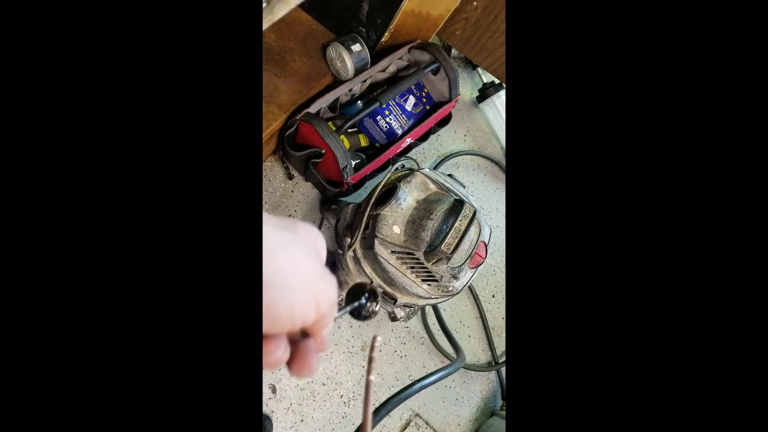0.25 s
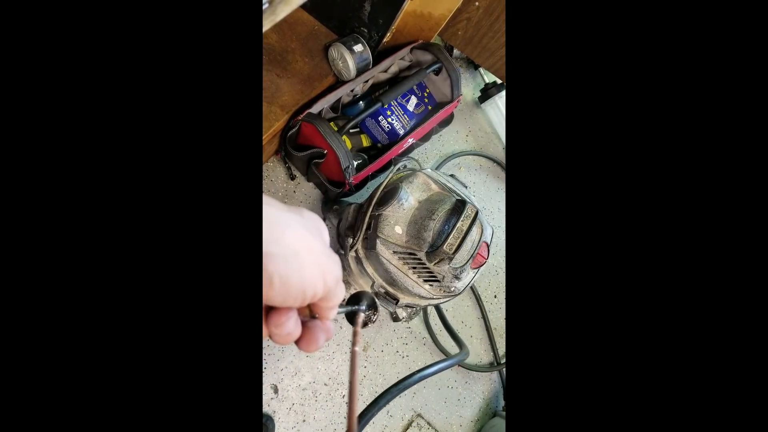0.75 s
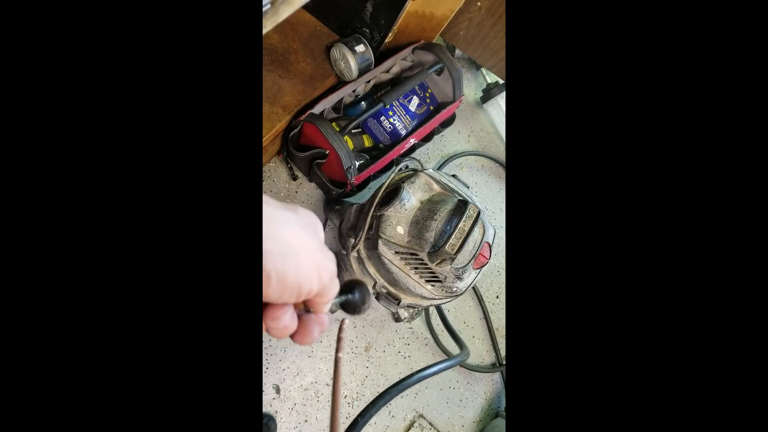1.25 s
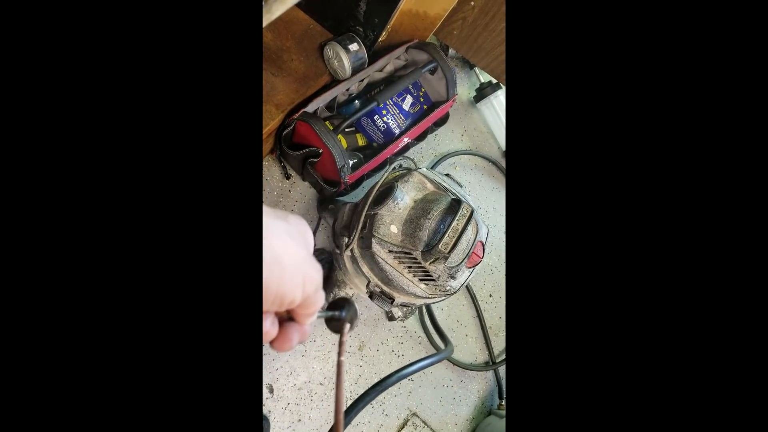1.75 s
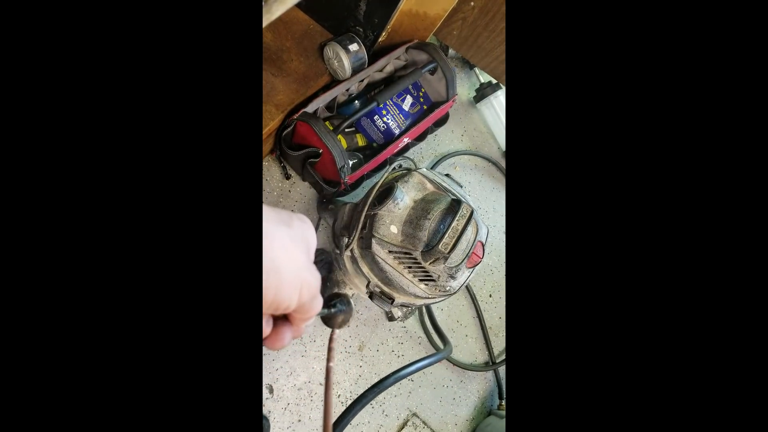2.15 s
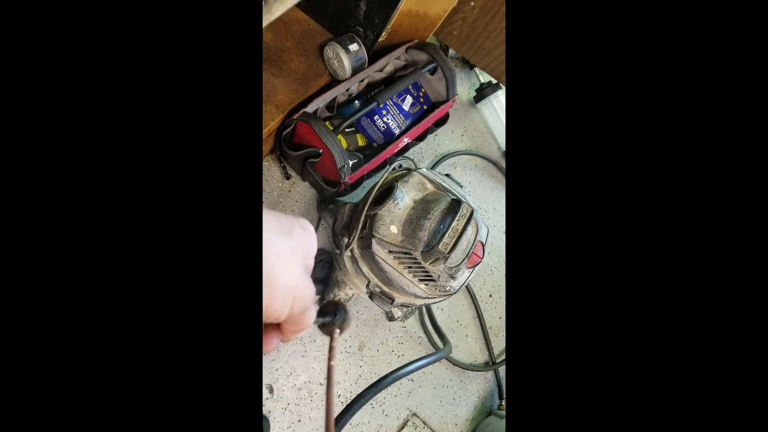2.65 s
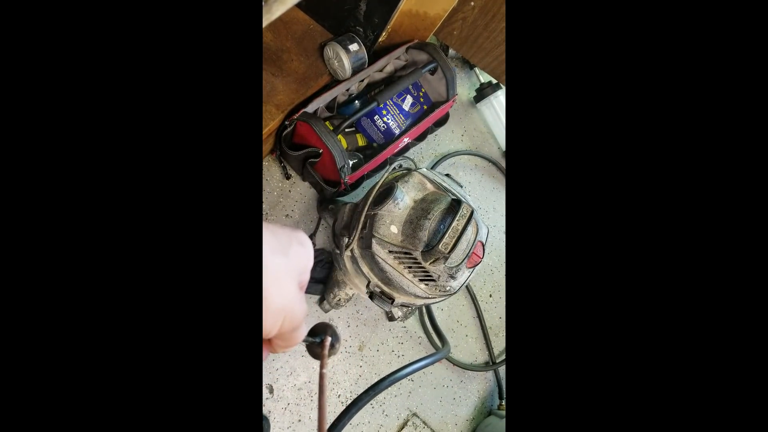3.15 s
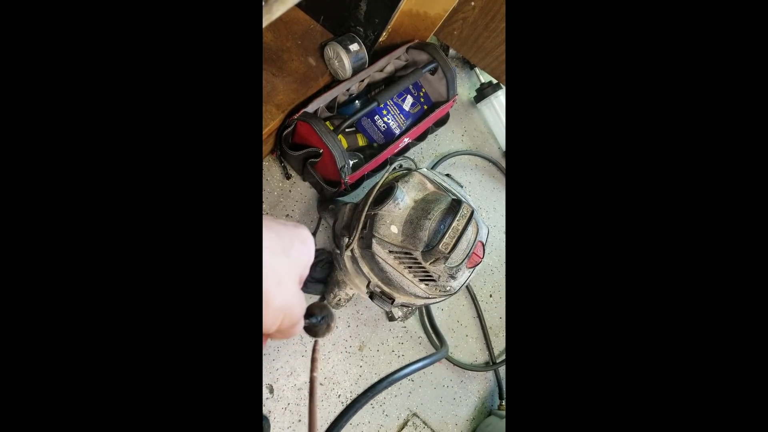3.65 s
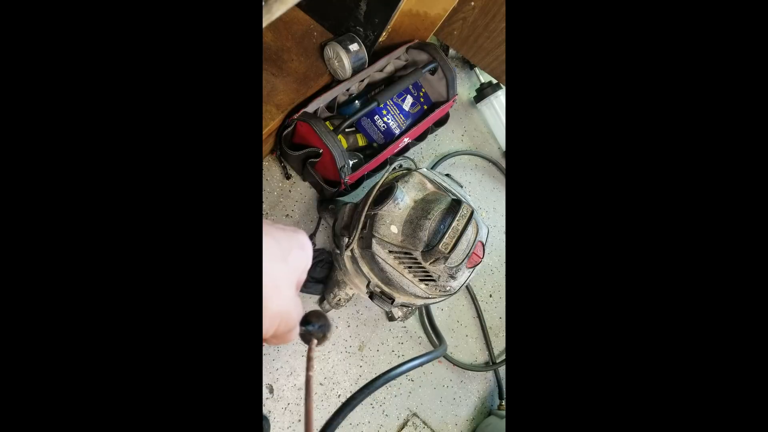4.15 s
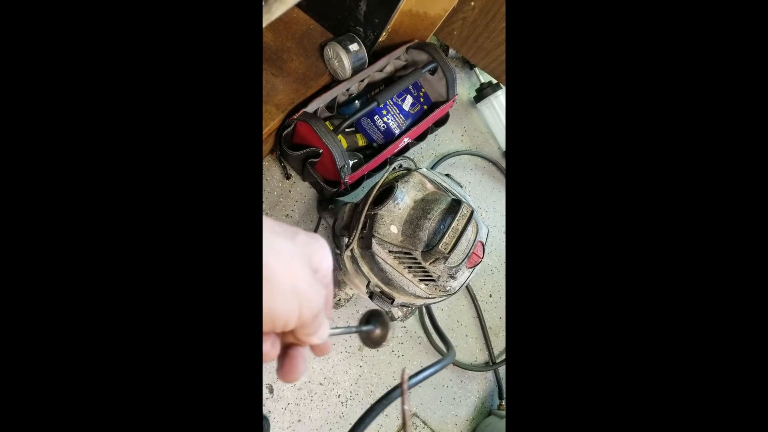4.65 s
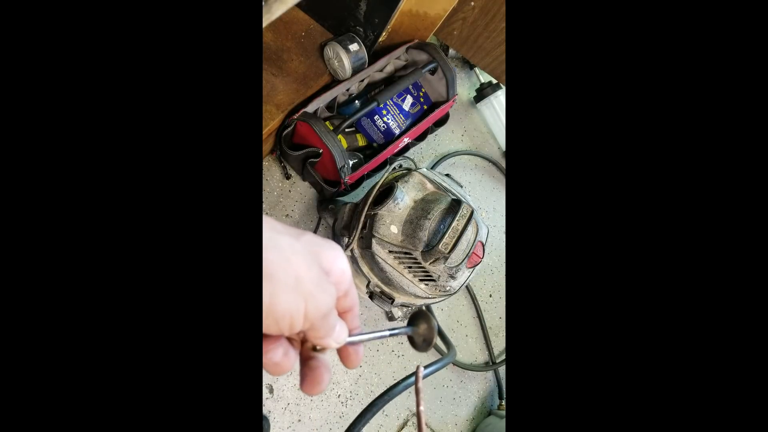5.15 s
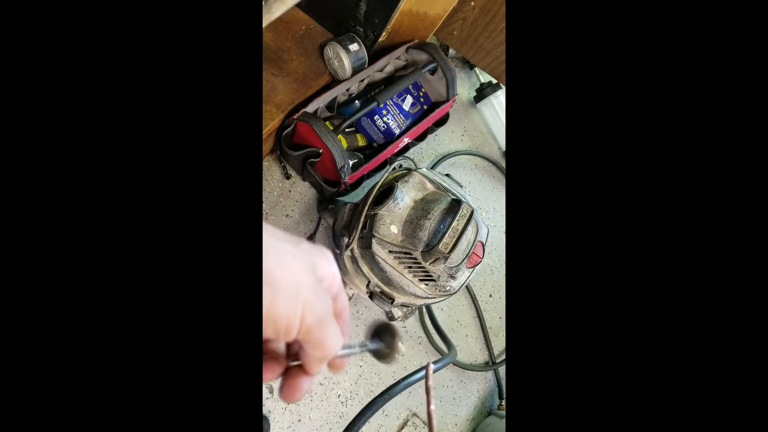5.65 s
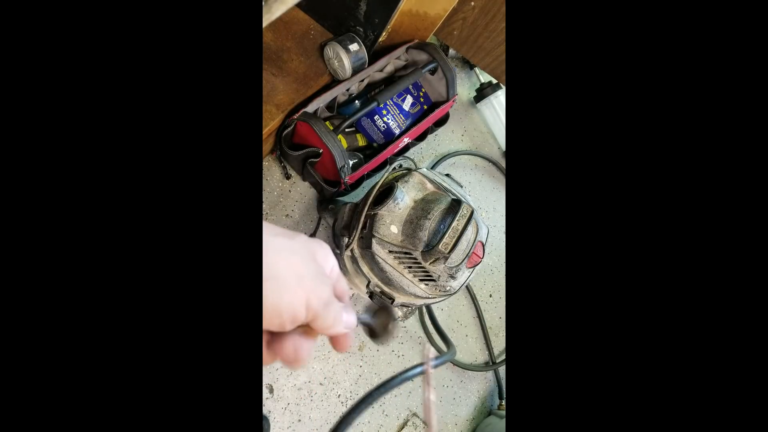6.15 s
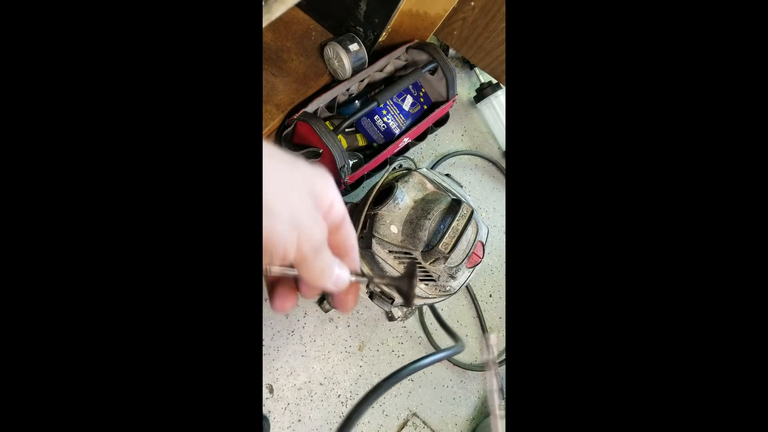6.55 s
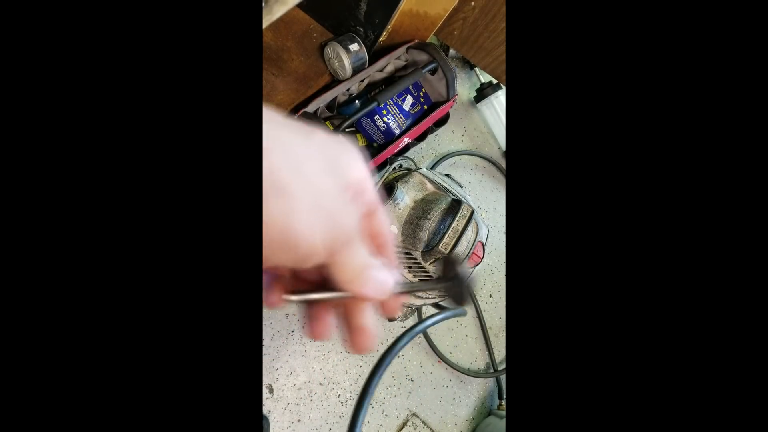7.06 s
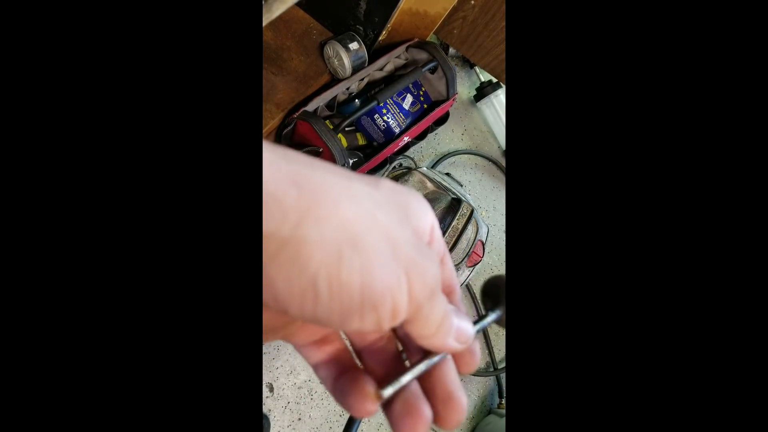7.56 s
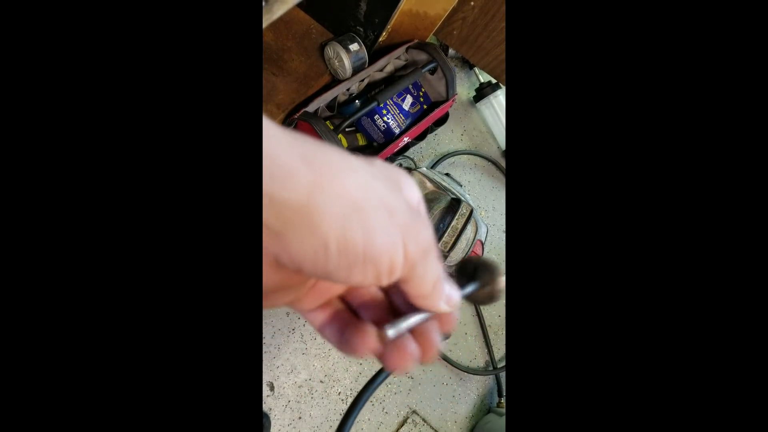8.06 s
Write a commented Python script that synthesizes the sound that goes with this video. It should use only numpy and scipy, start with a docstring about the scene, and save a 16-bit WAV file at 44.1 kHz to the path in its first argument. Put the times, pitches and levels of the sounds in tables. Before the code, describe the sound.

Close to a hand-held microphone in a small garage, a sleeve brushes and a grip rumbles softly. A quick puff of compressed air is followed by a long, loud, bright hiss against a metal engine valve, its tone shifting slightly with the angle. It cuts off suddenly with a short room tail, leaving near quiet, faint crackles, soft rubbing and a few small metal ticks.

```python
"""A sleeve brushes and a grip rumbles, then one short and one long blast of a blow gun hiss and roar.
The gun cleans an engine valve held close to a hand-held camera in a small garage: turbulent noise,
coloured by resonances and echoes, roars when the jet strikes the valve head squarely, then leaks faintly.
Then the valve is turned over in the hand: carbon crackles, fingers wipe, a sleeve rustles, and the
grip rubs the camera's shell, all as shaped noise; metal ticks are bursts of slips ringing decaying modes."""
import sys
import numpy as np
from scipy import signal
from scipy.fft import rfft, irfft
from scipy.io import wavfile
from scipy.ndimage import uniform_filter1d

SR = 44100
rng = np.random.default_rng(int(sys.argv[2]) if len(sys.argv) > 2 else 0)


def to_wav(sig):
    """Store sig (one row per channel, or 1-D mono) as 16-bit WAV at the path in sys.argv[1].

    Samples outside -1..1 are clipped; the rate is SR.
    """
    pcm = np.clip(np.atleast_2d(sig), -1, 1) * 32767
    pcm = np.round(pcm).astype(np.int16)
    wavfile.write(sys.argv[1], SR, pcm.T)  # frames by channels


N = 365994
SIZE = 1024  # samples in a noise frame; frames step by a quarter of it
HZ = np.fft.rfftfreq(SIZE, 1 / SR)
FRAME_S = np.arange(N // (SIZE // 4) + 5) * (SIZE // 4) / SR
TIME = np.arange(N) / SR


def amp(db):
    """Level law: decibels to amplitude gain."""
    return 10 ** (np.asarray(db) / 20)


def unit(x):
    """Power normalisation: scales to rms 1."""
    return x / np.sqrt(np.mean(x ** 2) + 1e-20)


def read(points, hz):
    """Spectral interpolation: reads a curve on a log-frequency axis."""
    f, value = np.transpose(points)
    return np.interp(np.log(hz + 1), np.log(f + 1), value)


def follow(rows, t):
    """Linear interpolation in time: reads each column of a table at the times t."""
    s, *columns = np.transpose(rows)
    return [np.interp(t, s, column) for column in columns]


def add(mix, s, sound):
    """Superposition: mixes a sound in at time s."""
    part = mix[..., max(round(s * SR), 0):][..., :sound.shape[-1]]
    part += sound[..., :part.shape[-1]]


def drift(t, top_hz):
    """Slow random modulation of rms 1: sines of random phase at rates up to top_hz."""
    knots = np.linspace(t[0], t[-1], min(len(t), 12000))
    wander = np.zeros(len(knots))
    for f in top_hz * np.geomspace(1 / 20, 1, 20):
        wander += np.sin(2 * np.pi * (f * knots + rng.random())) / np.sqrt(f)
    return unit(np.interp(t, knots, wander))


def noise(db, likeness, paths=1):
    """Partly coherent two-port noise of rms 1: db shapes its spectrum, paths is each port's complex gain."""
    a, b, c, d = rng.standard_normal((4, len(FRAME_S), len(HZ)))
    same = np.clip(likeness, 0, 1)
    left = a + 1j * b
    right = same * left + np.sqrt(1 - same ** 2) * (c + 1j * d)
    frames = np.array([left, right]) * amp(db) * paths
    ports = signal.istft(frames.swapaxes(1, 2), nperseg=SIZE, noverlap=SIZE - SIZE // 4)[1]
    return unit(ports[:, :N])


def pan(db):
    """Interaural level difference: gains of the two ports for a left-right difference in dB."""
    return amp(np.array([np.atleast_1d(db), -np.atleast_1d(db)]) / 2)


def bump(centre_hz, width_hz):
    """Resonance curve of Lorentzian shape, 1 at its top."""
    return 1 / (1 + (2 * (HZ - centre_hz) / width_hz) ** 2)


# Colour of the quiet air. Each row: frequency in Hz, relative spectral level in dB.
FLOOR_COLOUR = [(15, -30.5), (25, 3.5), (122, -0.5), (246, -23), (359, -7), (598, -23.5), (762, -21.5),
                (2060, -22.5), (2700, -19), (6550, -15), (8810, -27.5), (12500, -19.5), (15500, -25)]


def quiet_air(level_db=-68.5):
    """Diffuse-field coherence: background noise is alike at both ports only in the bass."""
    return amp(level_db) * noise(read(FLOOR_COLOUR, HZ), read([(100, 0.99), (1000, 0.19)], HZ))


# The hand brings the valve under the nozzle.
# One row: relative levels in dB of grip rubbing, cloth brushing, sleeve swish.
REACH = (-52.5, -50.5, -61.5)
# Loudness of the rubbing while the valve is turned over and looked at.
# Each row: time in seconds, relative levels in dB of grip rubbing, cloth brushing, sleeve swish.
TURNING = [(4.5, -84, -88, -68.5), (4.8, -76, -77.5, -66.5), (5.17, -77, -82, -72.5),
           (5.4, -63, -73.5, -63), (5.65, -65.5, -67, -62), (6.05, -69, -74, -62),
           (6.38, -67.5, -65, -61.5), (6.58, -56, -67, -62.5), (6.8, -59, -66, -57.5),
           (6.92, -55, -66, -63.5), (7.25, -57.5, -72.5, -65), (7.5, -66.5, -75, -70),
           (7.92, -66.5, -72.5, -72), (8.18, -59.5, -71.5, -69.5)]


def movement(jerk_db=4, jerk_s=0.06, rest_s=0.7, settle_db_per_s=31.5):
    """Friction grows with motion: gains of grip, cloth and sleeve in the reach and the later turning."""
    # the reach starts with a jerk, moves steadily, then comes to rest
    jerk = jerk_db * np.exp(-TIME / jerk_s)
    settling = settle_db_per_s * np.maximum(TIME - rest_s, 0)
    reach = amp(np.array(REACH)[:, None] + jerk - settling)
    air_is_off = TIME > PULLS[-1][1]
    return reach + amp(follow(TURNING, TIME)) * air_is_off


# Colours of grip, cloth and sleeve swish. Each row: frequency in Hz, relative spectral level in dB.
GRIP_COLOUR = [(25, 0.5), (60, -3), (130, 2.5), (250, -7.5), (400, -9), (700, -31), (2000, -57.5)]
CLOTH_COLOUR = [(150, -26.5), (400, -1.5), (750, 4), (1200, -1), (2000, -11), (4000, -44.5)]
SWISH_COLOUR = [(600, -17.5), (2000, -2.5), (3900, 2), (5200, -1.5), (7600, -1.5), (8600, -19),
                (10000, -18.5), (12500, -15.5), (15700, -14)]
# The grip slips and the camera's shell drones.
# Each row: start in seconds, end in seconds, mean pitch in Hz, relative level in dB.
SLIPS = [(0.08, 0.755, 201.8, -52.5), (0.94, 1.063, 205, -63), (6.48, 6.788, 203, -62.5),
         (6.76, 7.426, 202, -59.5)]


def handling(grip_db=1.5, cloth_db=-2.0, swish_db=-0.5, grain_db=1.0, drone_db=0.0, jitter=0.037, shake_db=3.0):
    """Friction noise and stick-slip: the grip rumbles through the camera's body, the sleeve brushes."""
    grip, cloth, swish = movement()
    rumble = grip * amp(grip_db) * noise(read(GRIP_COLOUR, HZ), 0.82)
    brush = cloth * amp(cloth_db) * noise(read(CLOTH_COLOUR, HZ), 0.19)
    grain = amp(swish_db + grain_db * drift(TIME, 200))
    fibres = swish * grain * noise(read(SWISH_COLOUR, HZ), 0.099)
    drone, slipping = np.zeros(N), np.zeros(N)
    for start, end, hz, db in SLIPS:
        # skin sticks and slips at the shell's resonance, unevenly
        t = np.arange(start, end, 1 / SR)
        turns = np.cumsum(hz * (1 + jitter * drift(t, 120))) / SR
        window = signal.windows.tukey(len(t), .3)
        level = amp(db + drone_db + shake_db * drift(t, 50))
        add(drone, start, window * level * unit(np.sin(2 * np.pi * turns)))
        add(slipping, start, window)
    # while it slips, part of the rubbing goes into the drone
    return rumble * amp(-3 * slipping) + drone + brush + fibres


# Soft pushes on the microphone, from the grip shifting and from spilled air.
# Each row: start in seconds, peak level in dB before panning.
GUSTS = [(0.05, -36), (0.059, -34.5), (0.696, -38), (0.823, -39), (0.868, -41), (1.076, -38.5),
         (1.261, -43.5), (1.554, -49.5), (2.584, -43), (3.35, -51)]


def gusts(push_s=0.0016, side_db=-5):
    """Pressure pulse: each puff gives the ports a soft push and a longer pull."""
    u = np.arange(SR // 10) / SR / push_s
    puff = u * (2 - u) * np.exp(-u)
    out = np.zeros(N)
    for s, db in GUSTS:
        add(out, s, amp(db) * puff / puff.max())
    return out * pan(side_db)


# Trigger pulls. Each row: time fully open in seconds, time it begins to shut in seconds.
PULLS = [(0.696, 0.856), (1.080, 4.189)]


def trigger(open_s=.0026, shut_s=.008):
    """Exponential flow transients: air swells as the seat lifts and dies as the nozzle empties."""
    flow = np.zeros(N)
    for on, off in PULLS:
        rise = np.minimum((TIME - on) / open_s, 0)
        fall = np.minimum((off - TIME) / shut_s, 0)
        flow += np.exp(rise + fall)
    return flow


SAG_S = 0.28  # time constant of the hose pressure, seconds


def surge(t):
    """Reservoir discharge: spare hose pressure, 1 as the trigger opens, sagging towards 0."""
    spare = 0
    for on, off in PULLS:
        pulled = (t > on - SAG_S / 10) * (t < off + SAG_S / 10)
        spare = spare + pulled * np.exp(-np.maximum(t - on, 0) / SAG_S)
    return spare


def delayed(ms):
    """Fourier shift theorem: complex gain of a delay in milliseconds."""
    return np.exp(-2j * np.pi * HZ * ms / 1000)


# Aim of the nozzle. Each row: time in seconds, lag of the left port in ms, factor on the gap's resonances.
BEARING = [(0.7, 0.054, 1), (1.3, 0.044, 1.01), (1.6, 0.059, 1.06), (2.6, 0.064, 1.01), (2.8, 0.085, 0.96),
           (4.2, 0.074, 1.06)]
# Near echoes off the hand, the gun and the engine.
# Each row: mean delay left in ms, mean delay right in ms, level in dB before the treble weighting.
ECHOES = [(0.62, 0.898, -17.5), (1.9, 1.6, -16), (3.1, 3.4, -13.5), (4.9, 4.6, -15)]
# Direction of the jet as the two ports hear it. Each row: frequency in Hz, left-right difference in dB.
JET_SIDE = [(100, -10.5), (400, -7.5), (1200, -1), (2800, -1.5), (4600, -1.5), (6500, 1), (7200, -4),
            (8100, -5.5), (9400, 0), (14500, -0.5), (15600, 9.5)]


def jet_paths(sway=.07):
    """Comb filtering: near echoes comb the hiss at each port, and the combs slide as the hand sways."""
    lag_ms = follow(BEARING, FRAME_S[:, None])[0]
    late = delayed(lag_ms / 2)
    paths = np.array([late, late.conj()])
    reflected = read([(700, 0.16), (2500, 1.0)], HZ)  # small surfaces throw back only short waves
    for left_ms, right_ms, db in ECHOES:
        stretch = 1 + sway * drift(FRAME_S, 2)[:, None]
        echo = np.array([delayed(left_ms * stretch), delayed(right_ms * stretch)])
        paths = paths + reflected * amp(db) * echo
    return paths * pan(read(JET_SIDE, HZ))[:, None]


# Basic colour of the jet. Each row: frequency in Hz, relative spectral level in dB.
JET_COLOUR = [(40, -45), (125, -25), (700, -22), (1300, -18.5), (2400, -12), (3500, -9), (4300, -2),
              (6500, 0), (7900, -1.5), (8700, -8.5), (9500, -10), (11800, -1.5), (14000, -4), (15700, -6.5)]
# Resonances of the gap between nozzle, valve and hand.
# Each row: frequency in Hz before the bearing's factor, width in Hz, boost in dB.
GAP = [(2400, 240, 2), (2750, 250, 3), (3060, 170, 2.5), (4400, 770, 1), (7574, 540, 3)]
# The hollow of the fingers, blown across by the deflected jet.
# Each row: time in seconds, frequency in Hz, boost in dB.
HOLLOW = [(0.7, 1985, 2), (1.1, 2200, 3.5), (1.35, 2156, 2.5), (1.6, 2400, 2.5), (3.0, 3000, -1),
          (3.68, 2950, 2), (3.85, 2350, 2.5), (4.2, 2370, 0.5)]
# How the jet meets the valve as it is turned. Each row: time in seconds, relative hiss level in dB,
# roar off the head in dB, sizzle at the rim in dB, all before surge, tremor and weighting.
AIM = [(0.755, -15, 3, -3.5), (0.8, -18, 2, 3), (0.845, -15, -3, 0), (1.1, -18.5, 1.5, 1.3),
       (1.25, -18, 1.2, 0), (1.42, -19, 2.4, -3), (2.06, -18, -0.3, -2), (2.25, -19, 0.1, 0.7),
       (2.61, -19.5, 1.5, -0.5), (2.67, -19.5, -3, -4), (2.98, -20, -3.3, 0.6), (3.29, -19.5, -4, 0.3),
       (3.42, -16, -1, 1.8), (3.62, -18, -0.5, -1.9), (3.93, -17.5, -1.5, 0.5), (4.03, -19, 1.5, -0.5),
       (4.17, -17.5, -0.1, 0.5)]


def jet(level_db=2.0, patchy_db=0.93, flutter_db=0.67, tremor_db=0.9, tremor_hz=7,
        surge_db=2.5, surge_roar_db=2.5):
    """Turbulent jet noise: hiss coloured by pressure and by how it meets the valve in an unsteady hand."""
    frame_s = FRAME_S[:, None]
    _, roar_db, sizzle_db = follow(AIM, frame_s)
    roar_db = roar_db + surge_roar_db * surge(frame_s)
    sizzle_db = sizzle_db + tremor_db * drift(FRAME_S, tremor_hz)[:, None]
    _, narrowing = follow(BEARING, frame_s)
    db = read(JET_COLOUR, HZ)
    for hz, width, gain in GAP:
        db = db + gain * bump(hz * narrowing, width)
    hollow_hz, hollow_db = follow(HOLLOW, frame_s)
    db = db + hollow_db * bump(hollow_hz, 450)
    # a square hit on the head sheds large eddies; grazing the rim sheds small ones
    db = db + roar_db * read([(300, -0.24), (900, 0.13), (1900, 0.71), (3300, 0.84), (5500, -0.17)], HZ)
    db = db + sizzle_db * read([(7500, 0.067), (11000, 1)], HZ)
    # noise smoothed over time, then over frequency, makes patches
    eddies = uniform_filter1d(rng.standard_normal(db.shape), size=24, axis=0)
    eddies = uniform_filter1d(eddies, size=8, axis=1)
    likeness = read([(200, 0.56), (1400, 0.44), (4500, 0.87), (9000, 0.49), (16000, 0.87)], HZ)
    hiss = noise(db + patchy_db * unit(eddies), likeness, jet_paths())
    hiss_db = follow(AIM, TIME)[0] + surge_db * surge(TIME)
    return hiss * trigger() * amp(level_db + hiss_db + flutter_db * drift(TIME, 60))


# What the valve and gun ring with, deepest first.
# Each row: frequency in Hz, relative level in dB, time to fall 60 dB in seconds.
METAL = [(2335, 1.5, 0.023), (3920, -0.5, 0.007), (4276, -2.5, 0.007), (7220, -0.5, 0.0056),
         (10210, -9.5, 0.0037), (13600, 4, 0.004)]
# Small metal contacts. Each row: time in seconds, peak level in dB before reflections and panning,
# scrape length in seconds, brightness in dB per octave, share of the deep clink from 0 to 1.
TICKS = [(0.9832, -22.5, 0.0025, 4.5, 0), (5.308, -46.5, 0.0036, 0, 0.3), (6.015, -45, 0.002, -2, 0.1),
         (6.2667, -48, 0.0019, -3, 0.07), (6.313, -37, 0.0024, 0, 0.2), (6.4888, -33.5, 0.0034, 3, 0.5),
         (6.9713, -39, 0.0029, 1, 0), (7.0637, -34.5, 0.0022, 8, 0), (7.094, -40, 0.0015, -1, 0),
         (7.1106, -27, 0.003, 2, 0.2), (7.113, -27, 0.0054, 6, 0.1), (7.1275, -45, 0.003, -6, 0.2),
         (7.159, -36, 0.005, 0, 0.5), (7.1647, -32, 0.0067, 1.5, 1), (7.8337, -48, 0.0046, -4, 0),
         (7.877, -42, 0.0049, 3, 0.3), (7.883, -31.5, 0.0015, 2, 0), (7.889, -38, 0.0014, -0.5, 0),
         (8.0917, -39, 0.0033, -1.5, 0)]


def ticks(level_db=0.0, ring=0.17, lag_s=0.00048, scatter=0.33):
    """Modal excitation: a quick run of tiny slips rings the metal briefly, nearer the right port."""
    t = np.arange(SR // 10) / SR
    modes = np.array([amp(db - 60 * t / t60) * np.cos(2 * np.pi * hz * t) for hz, db, t60 in METAL])
    hz = np.fft.rfftfreq(len(t), 1 / SR)
    base_db = read([(500, -17.5), (2000, -5.0), (4000, -1), (15000, 0), (17000, -14.5)], hz)
    lead = SR // 500  # samples of room before the contact
    out = np.zeros((2, N))
    for s, db, length, bright_db, clink in TICKS:
        body = (t == 0) + ring * (clink * modes[0] + modes[1:].sum(0))
        # slips common to both ports plus each port's own
        slips = rng.standard_normal(len(t)) + scatter * rng.standard_normal((2, len(t)))
        slips = np.roll(slips * np.exp(-(t / length) ** 4), lead, axis=1)
        colour = amp(bright_db * np.log2((hz + 500) / 7000) + base_db)
        tick = irfft(rfft(slips) * rfft(body) * colour, len(t))
        left, right = amp(db + level_db) * tick / abs(tick).max()
        add(out[0], s - lead / SR + lag_s / 2, left)
        add(out[1], s - lead / SR - lag_s / 2, right)
    return out


# When loose carbon crackles. One row: start in seconds, end in seconds.
CRUMBLING = (4.36, 4.8)


def crumbs(per_s=50, db=-65, grain_s=0.0023):
    """Random impulse process: loosened carbon crackles between the fingers once the air has stopped."""
    loose = (TIME > CRUMBLING[0]) * (TIME < CRUMBLING[1])
    hit = (rng.random(N) < per_s / SR) * loose
    decay = np.exp(-TIME[:SR // 20] / grain_s)
    grains = signal.oaconvolve(hit * rng.uniform(0.33, 1, N), decay)[:N]
    colour = read([(1500, -25), (4000, -8), (7500, -4), (9200, -8), (12000, 7), (15500, -11)], HZ)
    return amp(db) * grains * noise(colour, 0.33)


# Soft swells of noise: the first two rows leak from the nozzle, the later ones are finger wipes.
# Each row: time of the crest in seconds, time from crest to e^-2 of its amplitude in seconds,
# relative level in dB, centre frequency in Hz.
SWELLS = [(4.452, 0.17, -65, 13100), (4.718, 0.1, -68, 13180), (6.025, 0.051, -67, 13100),
          (6.127, 0.079, -66, 13200), (6.637, 0.027, -56, 766), (6.73, 0.041, -58.5, 13000),
          (6.80, 0.06, -62, 840), (6.828, 0.067, -64, 12000)]
LEAKS, WIPES = SWELLS[:2], SWELLS[2:]


def swells(rows):
    """Band-limited noise: each row swells and fades under a Gaussian envelope."""
    t = np.arange(-SR // 4, SR // 4) / SR
    hz = np.fft.rfftfreq(len(t), 1 / SR)
    out = np.zeros((2, N))
    for s, length, db, centre_hz in rows:
        band = np.interp(hz, HZ, bump(centre_hz, 0.64 * centre_hz))
        grain = irfft(rfft(rng.standard_normal((2, len(t)))) * band, len(t))
        both = unit(grain + 0.16 * grain[::-1])  # each port hears a little of the other
        add(out, s + t[0], amp(db) * np.exp(-2 * (t / length) ** 2) * both)
    return out


def nozzle_leak():
    """Small-orifice turbulence: faint high hiss leaks from the nozzle after the trigger shuts."""
    return swells(LEAKS)


def wipes():
    """Sliding friction: short soft rubs of fingers wiping the valve."""
    return swells(WIPES)


# Reverberation of the garage.
# Each row: frequency in Hz, time to fall 60 dB in seconds, relative level of the reflections in dB.
GARAGE = [(200, 0.33, -5), (1100, 0.39, -0.5), (3000, 0.44, -1.5), (6995, 0.39, -3.5), (12000, 0.3, -2),
          (16130, 0.28, -0.5)]


def garage(x, wet_db, turn_hz=0.6025):
    """Frequency-dependent reverberation: two dense patterns of reflections trade shares steadily."""
    out, room = x, np.array(GARAGE)
    for k in range(2):
        taps = rng.choice([-1., 1.], (2, SR)) * (rng.random((2, SR)) < .2)
        taps[:, :round(.005 * SR)] = 0  # silence before the first reflection
        hz, t, z = signal.stft(taps, SR, nperseg=256)
        t60 = read(room[:, :2], hz[:, None])
        db = read(room[:, ::2], hz[:, None])
        tail = signal.istft(z * amp(db - 60 * t / t60), SR)[1]
        tail /= np.linalg.norm(tail, axis=1, keepdims=True)
        share = np.cos(2 * np.pi * turn_hz * TIME + k * np.pi / 2)
        out = out + amp(wet_db) * signal.fftconvolve(x * share, tail, axes=1)[:, :N]
    return out


def scene():
    """Superposition: the blasts and the handling in the garage, over its quiet air."""
    air = quiet_air() * pan(-1)
    rubbing = handling() * pan(-2.5)
    pushes = gusts()
    blasts = garage(jet(), -10.5)
    metal = garage(ticks(), -12.0) * pan(-8.5)
    faint = (crumbs() + nozzle_leak() + wipes()) * pan(-3.0)
    return air + rubbing + pushes + blasts + metal + faint


def record(dry, edge_hz=15800):
    """Soft saturation rounds off the highest peaks, then a low-pass limits the band."""
    soft = dry / (1 + (dry / .85) ** 8) ** (1 / 8)
    lowpass = signal.firwin(801, edge_hz, window=("kaiser", 8), fs=SR)
    return signal.oaconvolve(soft, lowpass[None], "same", axes=1)


dry = scene()
out = record(dry)
to_wav(out)
```